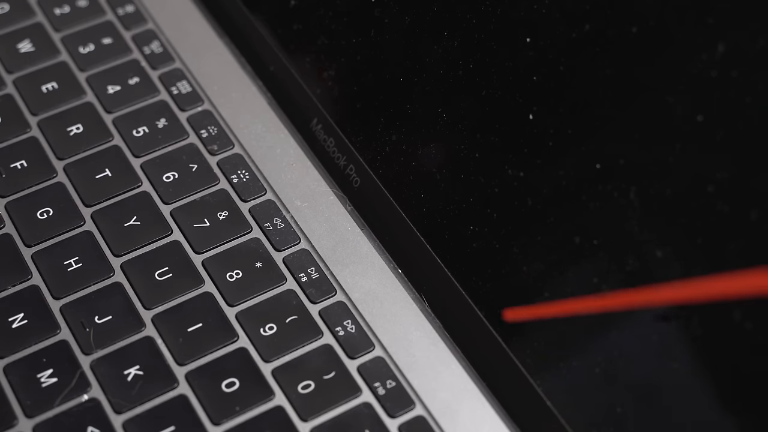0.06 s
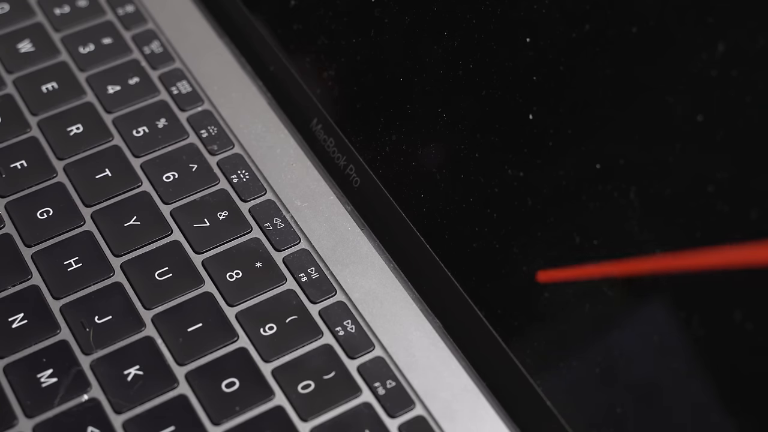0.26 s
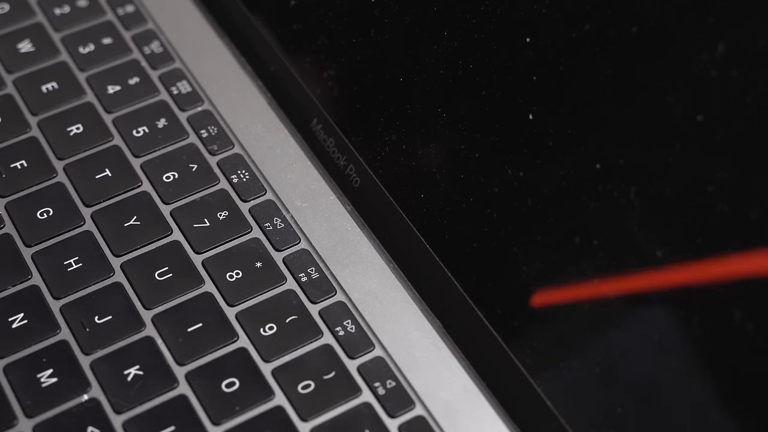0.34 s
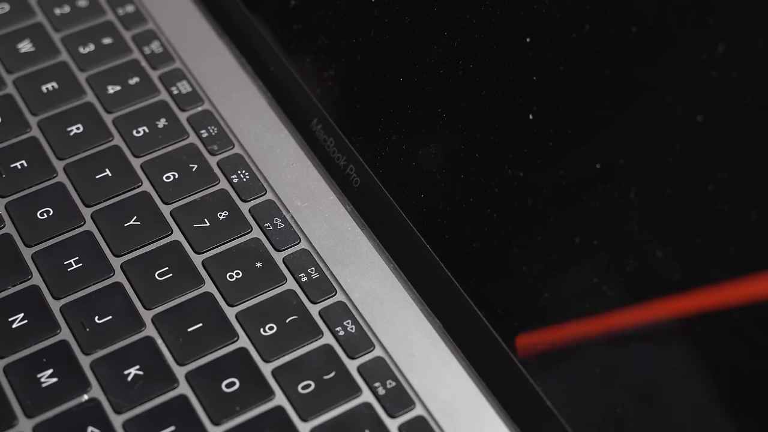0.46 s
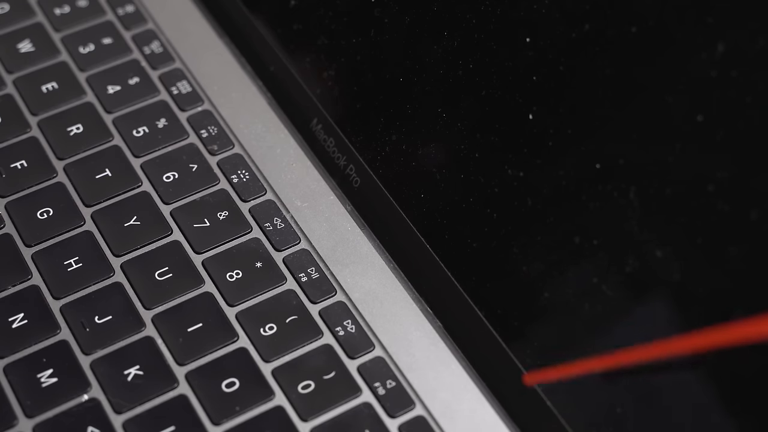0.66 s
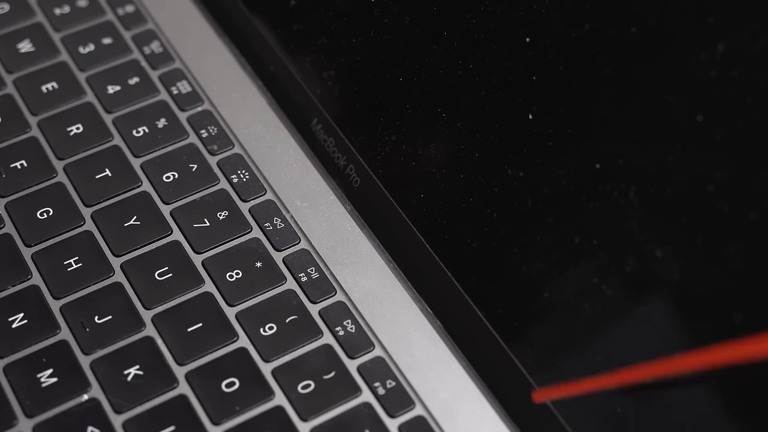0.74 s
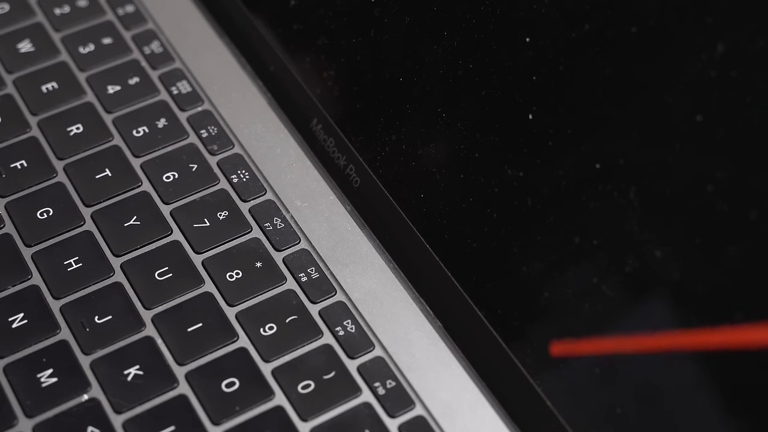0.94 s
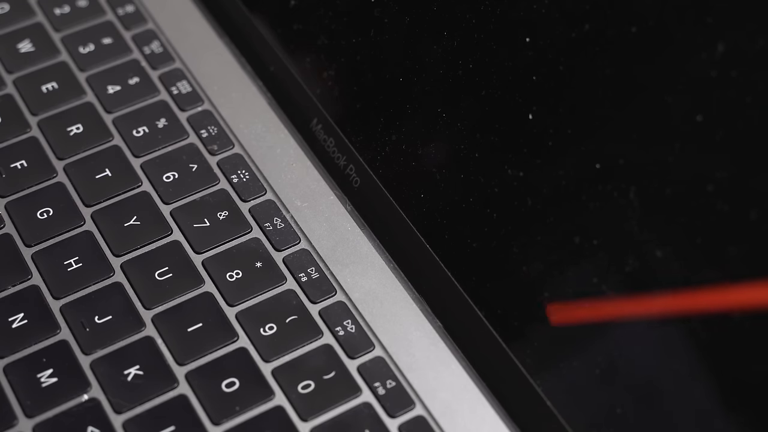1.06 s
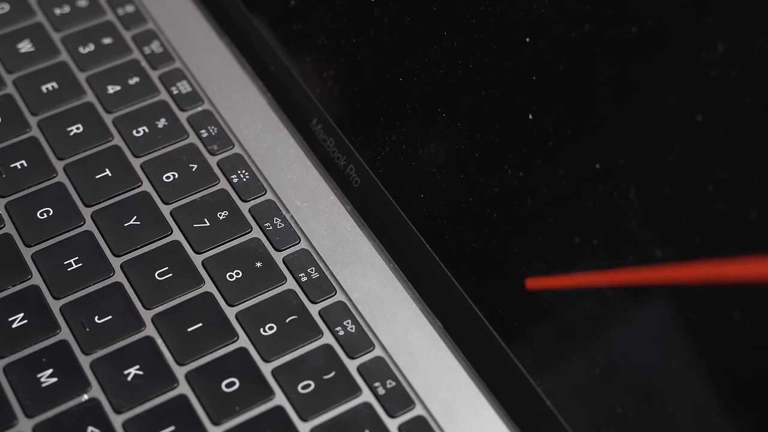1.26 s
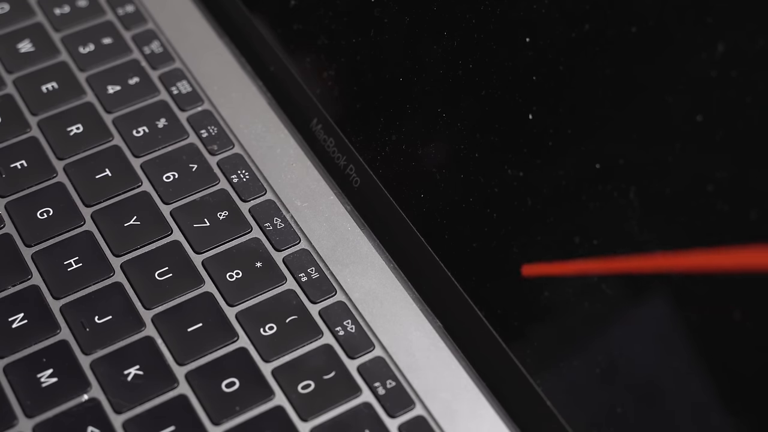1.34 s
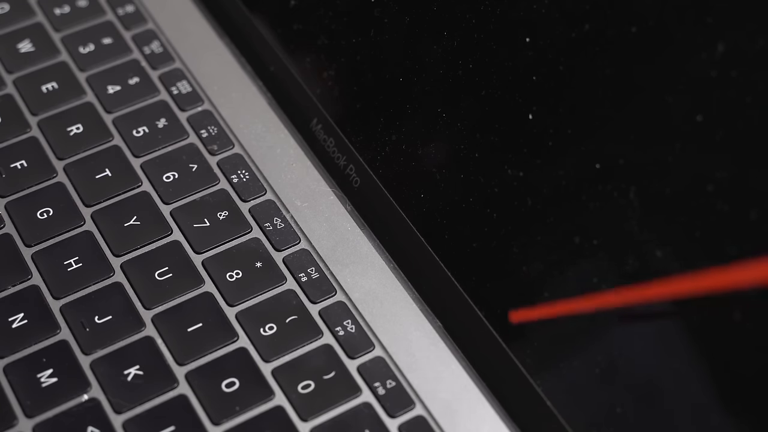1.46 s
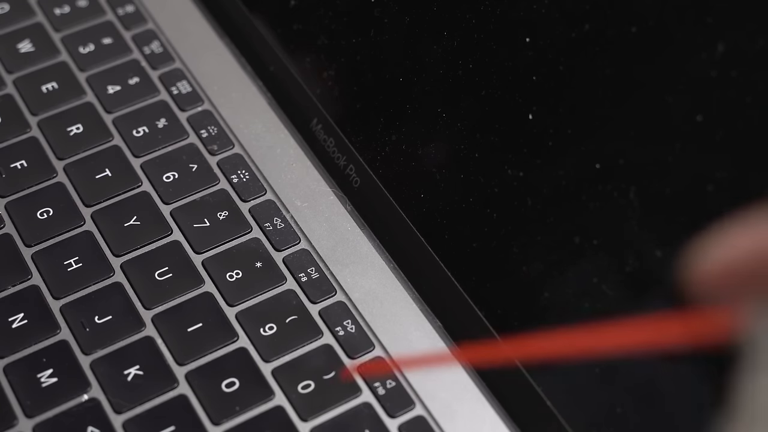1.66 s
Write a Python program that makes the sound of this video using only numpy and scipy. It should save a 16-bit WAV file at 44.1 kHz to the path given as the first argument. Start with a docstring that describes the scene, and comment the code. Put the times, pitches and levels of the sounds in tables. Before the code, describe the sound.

A compressed air can fires five short hissing bursts at a laptop: a softer first one, three brighter, louder spurts, then a longer, quieter puff. Close mono microphone, small room, faint low hum.

```python
"""A small room: a can of compressed air is fired five times through a thin straw at a laptop's hinge and keys.
The free jet is high hissing noise; its blast on edges and gaps rushes lower, with a roar, faint whistles
and hollow rings made by narrow resonances on noise. Each opening and closing of the valve kicks a low puff.
A short diffuse room tail follows the spray; a noisy low hum and a thin hiss lie underneath. The sound is mono.
"""
import sys
import numpy as np
from scipy import signal
from scipy.fft import rfft, irfft
from scipy.io import wavfile

SR = 44100
rng = np.random.default_rng(int(sys.argv[2]) if len(sys.argv) > 2 else 0)


def wav_record(signal):
    """Record a signal, one row per channel, as 16-bit PCM in the file named by sys.argv[1]."""
    frames = np.transpose(np.atleast_2d(signal))
    bounded = np.clip(frames, -1, 1)
    # unit amplitude maps onto the largest positive 16-bit level
    quanta = np.round(bounded * 32767).astype(np.int16)
    wavfile.write(sys.argv[1], SR, quanta)


N = 74970  # length in samples


def from_db(db):
    """Turn dB into gain."""
    return 10 ** (np.asarray(db) / 20)


def rms_one(x):
    """Scale to rms 1."""
    return x / np.sqrt(np.mean(x ** 2) + 1e-20)


def at_hz(points, hz):
    """Read a table on a log-frequency axis, held flat beyond its ends."""
    f, values = np.transpose(points)
    return np.interp(np.log(hz + 1e-9), np.log(f), values)


def coloured(spectrum):
    """Steady noise: white noise shaped to a spectrum, rms 1."""
    gain = from_db(at_hz(spectrum, np.fft.rfftfreq(N, 1 / SR)))
    return rms_one(irfft(rfft(rng.standard_normal(N)) * gain, N))


def resonate(x, hz, width_hz):
    """One two-pole resonance, gain about 1 at its peak; a narrower one rings longer."""
    r = np.exp(-np.pi * width_hz / SR)
    zeros = [(1 - r * r) / 2, 0, (r * r - 1) / 2]
    poles = [1, -2 * r * np.cos(2 * np.pi * hz / SR), r * r]
    return signal.lfilter(zeros, poles, x + 1e-18)


def narrow(peaks):
    """Noise twice through each resonance gives faint wavering tones; their mix has rms 1."""
    mix = np.zeros(N)
    for hz, width_hz, db in peaks:
        once = resonate(rng.standard_normal(N), hz, width_hz)
        twice = resonate(once, hz, width_hz)
        mix += from_db(db) * rms_one(twice)
    return rms_one(mix)


# Noise colour of the low hum: (f/Hz, relative level/dB per Hz)
HUM_COLOUR = [(15, -20), (30, -14), (55, -19.5), (90, -1.5), (135, -12.5), (190, -15.5), (300, -21),
              (600, -29.5), (1200, -36), (1450, -42.5), (3500, -46), (5000, -56.5), (16000, -59.5)]
HUM_DB = -64.5
THIN_HISS_HZ, THIN_HISS_WIDTH_HZ, THIN_HISS_DB = 7550, 700, -88.5  # width of each resonant pass


def background():
    """Low hum of the room as coloured noise, plus a thin steady hiss of narrow noise."""
    hum = from_db(HUM_DB) * coloured(HUM_COLOUR)
    hiss = narrow([(THIN_HISS_HZ, THIN_HISS_WIDTH_HZ, 0)])
    return hum + from_db(THIN_HISS_DB) * hiss


# Valve moves, one row a burst:
# (opening t/s, closing t/s, opening puff level/dB, closing puff level/dB, seep level/dB re full flow)
VALVE_MOVES = [(.231, 0.368, -40.5, -47, -13.5), (0.52, 0.614, -45, -45.5, -38),
               (.695, .800, -48.5, -43.5, -30), (.938, 1.062, -43, -42, -45),
               (1.231, 1.448, -43, -42, -31.5)]
OPEN_S, CLOSE_S = 0.0062, 0.01  # ramp lengths, centred on the valve times
SEEP_S = 0.0079  # gas seeps out before the valve gives way


def flow():
    """Flow through the valve, 0-1: rounded ramps, with gas seeping ahead of each burst."""
    t = np.arange(N) / SR
    opening = np.zeros(N)
    for open_s, close_s, _, _, seep_db in VALVE_MOVES:
        nearest_edge = np.minimum((t - open_s) / OPEN_S, (close_s - t) / CLOSE_S)
        ramp = np.sin(np.pi / 2 * np.clip(nearest_edge + 0.5, 0, 1)) ** 2
        rise = np.clip(1 + (t - open_s) / SEEP_S, 0, 1) ** 2
        seep = from_db(seep_db) * rise * (t < close_s)
        opening = np.maximum(opening, np.maximum(ramp, seep))
    return opening


def drift(rate_hz):
    """Slow random movement, rms 1: noise through two one-pole lowpasses, past their warm-up."""
    r = np.exp(-2 * np.pi * rate_hz / SR)
    slow = signal.lfilter([1], [1, -2 * r, r * r], rng.standard_normal(N + SR))
    return rms_one(slow[SR:])


FLICKER_DB, FLICKER_HZ = 0, 40  # depth 0 dB: the turbulence holds steady


def turbulence(spectrum):
    """Rushing air as coloured noise, its level moved by a drift of the set depth."""
    rush = coloured(spectrum)
    return rms_one(rush * from_db(FLICKER_DB * drift(FLICKER_HZ)))


# Spray mix at full flow, one list a burst: (t/s, free jet level/dB, blast on edges level/dB,
# roar in the gaps level/dB, whistle level/dB, hollow ring level/dB)
SPRAY_LEVELS = [
    [(0.238, -34.5, -31.5, -33, -35, -43), (0.262, -34, -31.5, -33, -42, -38),
     (0.326, -33, -36, -39, -37.5, -38), (0.36, -34.5, -36, -38.5, -49, -41)],
    [(0.526, -24, -25.5, -41, -27, -37), (0.538, -28, -22, -37, -31.5, -31.5),
     (0.582, -21, -25.5, -42.5, -23.5, -39.5), (0.608, -23.5, -23.5, -40.5, -29.5, -35)],
    [(0.702, -21.5, -23.5, -41.5, -36, -35), (0.746, -23, -21, -40.5, -37.5, -40.5),
     (0.784, -23, -23.5, -43.5, -33, -33.5), (0.795, -22.5, -25.5, -43, -35.5, -59)],
    [(0.945, -24.5, -27, -42.5, -33.5, -37), (0.965, -27, -21.5, -39.5, -31.5, -35.5),
     (0.977, -35.5, -26, -45, -29.5, -32.5), (0.985, -32, -24, -34, -32.5, -30.5),
     (1.031, -33, -30, -35, -29, -30.5), (1.057, -33, -27, -30, -31, -35)],
    [(1.238, -34, -30.5, -37, -31, -30), (1.248, -34.5, -29.5, -33, -29.5, -31),
     (1.26, -35.5, -29.5, -41, -47, -39), (1.27, -32.5, -36.5, -37.5, -38, -36),
     (1.328, -34, -36.5, -36.5, -38, -45), (1.342, -35, -33.5, -37.5, -47, -59),
     (1.396, -33, -37.5, -38.5, -53, -46), (1.441, -35.5, -28.5, -35, -31, -31)],
]
# Noise colours of free jet, blast on edges and roar in the gaps: (f/Hz, relative level/dB per Hz)
JET_COLOUR = [(1500, -28), (4000, -10), (7000, -1.5), (9000, -2.5), (10500, -2), (12300, 1.5),
              (14000, -1.5), (16000, -6)]
BLAST_COLOUR = [(900, -28), (1800, -11.5), (2700, -8.5), (3400, -1), (4100, -2), (4650, -2), (5200, -2.5),
                (5900, -1), (7000, -4), (8500, -6), (12000, -15.5)]
ROAR_COLOUR = [(60, -33), (200, -17.5), (420, -11), (650, -1.5), (1100, 0), (1600, -2.5), (2200, -7.5),
               (3000, -5), (6000, -29.5)]
# Whistles in the blast: (f/Hz, width of each pass/Hz, relative level/dB)
WHISTLE_PEAKS = [(3613, 100, 3.5), (3297, 110, 0.5), (4113, 130, -3.5), (5100, 38, -5), (5262, 69, -1),
                 (5800, 220, -4.5), (3330, 860, -2.5)]
# Hollows under the keys: (f/Hz, width of each pass/Hz, relative level/dB)
HOLLOW_PEAKS = [(1586, 250, -2.5), (1941, 150, -3.5), (2450, 130, -6), (2150, 1300, 0)]


def spray(opening):
    """Turbulence, whistles and hollow rings, each riding its own level and let through by the valve."""
    t = np.arange(N) / SR
    level_t, *levels_db = np.transpose(np.concatenate(SPRAY_LEVELS))
    layers = [
        turbulence(JET_COLOUR),
        turbulence(BLAST_COLOUR),
        turbulence(ROAR_COLOUR),
        narrow(WHISTLE_PEAKS),
        narrow(HOLLOW_PEAKS),
    ]
    air = np.zeros(N)
    for db, layer in zip(levels_db, layers):
        air += from_db(np.interp(t, level_t, db)) * layer
    return opening * air


# Time for the room tail to fall by 60 dB: (f/Hz, t/s)
ROOM_DECAY = [(300, 0.74), (800, 0.24), (2100, 0.27), (5500, 0.24), (15000, 0.14)]
# Starting colour of the room tail: (f/Hz, relative level/dB)
ROOM_TINT = [(300, -1), (2000, 2.5), (6000, 1), (15000, -3.5)]
ROOM_DB, ROOM_GAP_S = -15.5, 0.001  # tail energy re the spray; silence ahead of the tail


def room(x):
    """Diffuse reflections: the spray convolved with noise that dies band by band."""
    t = np.arange(SR // 2) / SR
    tail = np.zeros(len(t))
    edges = np.geomspace(150, 18000, num=15)
    for low, high in zip(edges, edges[1:]):
        hz = np.sqrt(low * high)
        band_filter = signal.butter(2, [low, high], "band", fs=SR, output="sos")
        band = signal.sosfilt(band_filter, rng.standard_normal(len(t)))
        decay_db = -60 * t / at_hz(ROOM_DECAY, hz)
        tail += band * from_db(at_hz(ROOM_TINT, hz) + decay_db)
    tail *= t > ROOM_GAP_S
    tail /= np.sqrt(np.sum(tail ** 2))
    return from_db(ROOM_DB) * signal.fftconvolve(x, tail)[:N]


PUFF_HZ, PUFF_WIDTH_HZ, PUFF_SOFT_HZ = 49.6, 39, 120  # resonance, its width, lowpass
BUFFET_DB, BUFFET_HZ = -64, 60  # low wind at full flow, and its lowpass


def puffs(opening):
    """A push of air when the flow starts, a pull when it stops, and low wind between."""
    kicks = np.zeros(N)
    for open_s, close_s, open_db, close_db, _ in VALVE_MOVES:
        kicks[int(open_s * SR)] = from_db(open_db)
        kicks[int(close_s * SR)] = -from_db(close_db)
    click = np.eye(1, SR // 4)[0]
    thump = resonate(click, PUFF_HZ, PUFF_WIDTH_HZ)
    shape = signal.lfilter(*signal.butter(2, PUFF_SOFT_HZ, fs=SR), thump)
    pushes = signal.fftconvolve(kicks, shape / shape.max())[:N]

    wind_filter = signal.butter(2, BUFFET_HZ, fs=SR, output="sos")
    wind = signal.sosfilt(wind_filter, rng.standard_normal(N))
    return pushes + from_db(BUFFET_DB) * opening * rms_one(wind)


def scene():
    """Spray, its room, the puffs and the background, alike in both channels."""
    opening = flow()
    air = spray(opening)
    mono = air + room(air) + puffs(opening) + background()
    return np.tile(mono, (2, 1))


CUTOFF_HZ = 15750


def record(dry):
    """Cut the top with a steep elliptic lowpass."""
    lowpass = signal.ellip(12, 0.3, 60, CUTOFF_HZ, fs=SR, output="sos")
    return signal.sosfilt(lowpass, dry)


dry = scene()
out = record(dry)
wav_record(out)
```